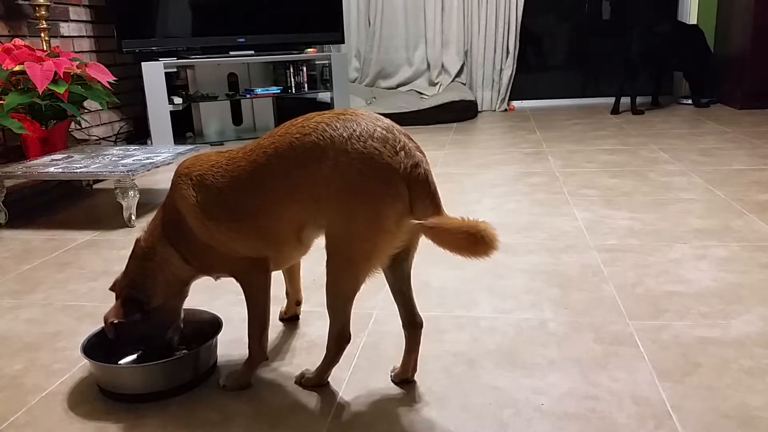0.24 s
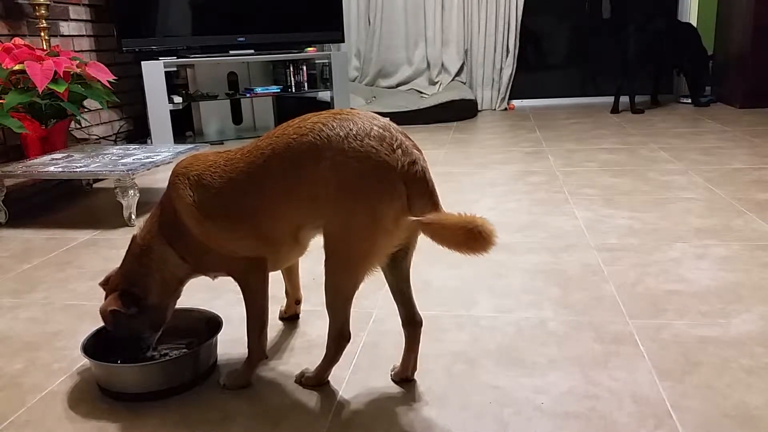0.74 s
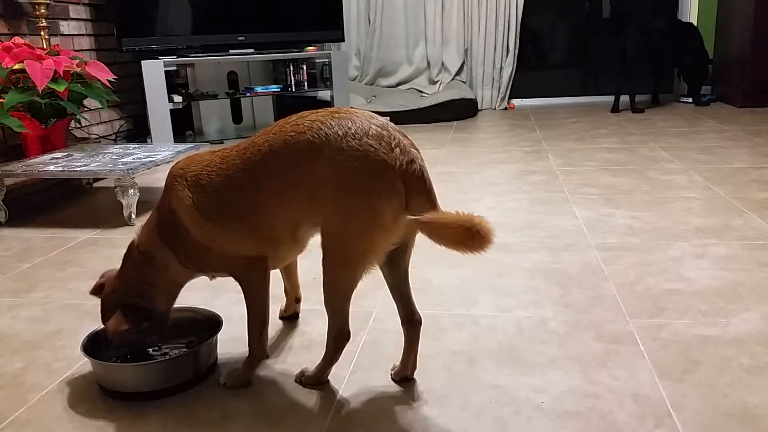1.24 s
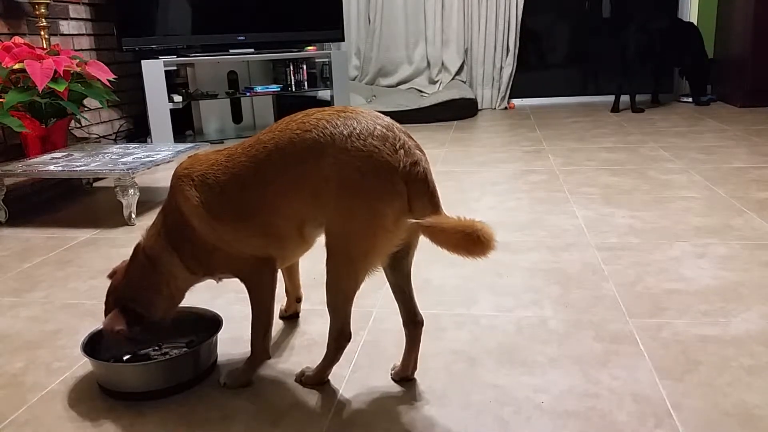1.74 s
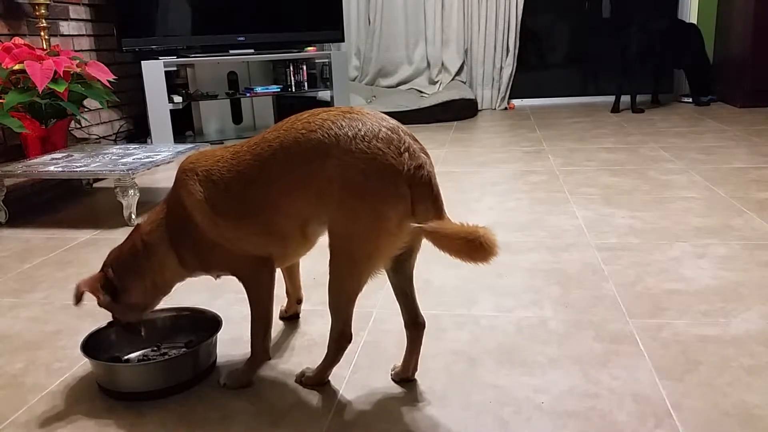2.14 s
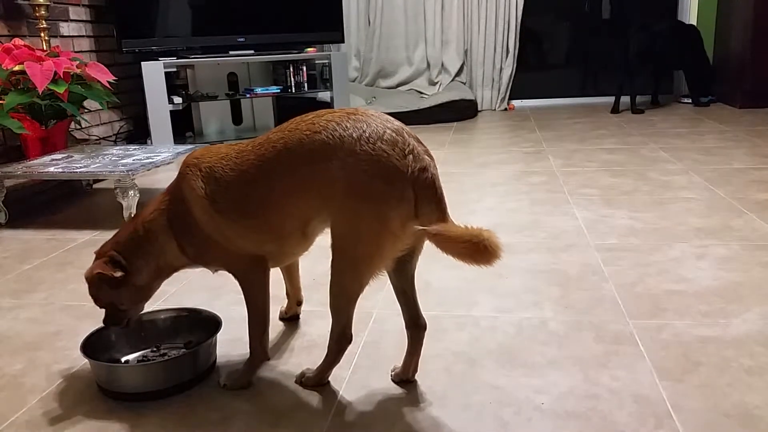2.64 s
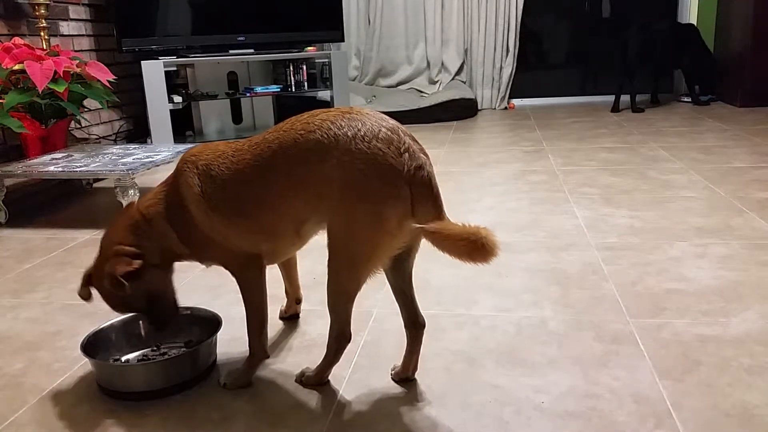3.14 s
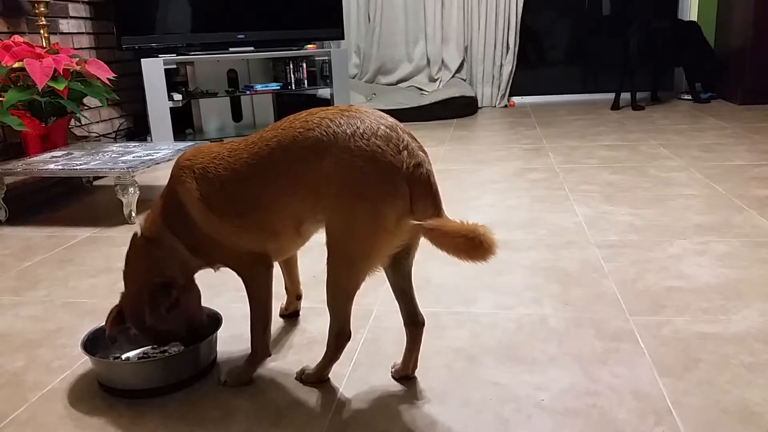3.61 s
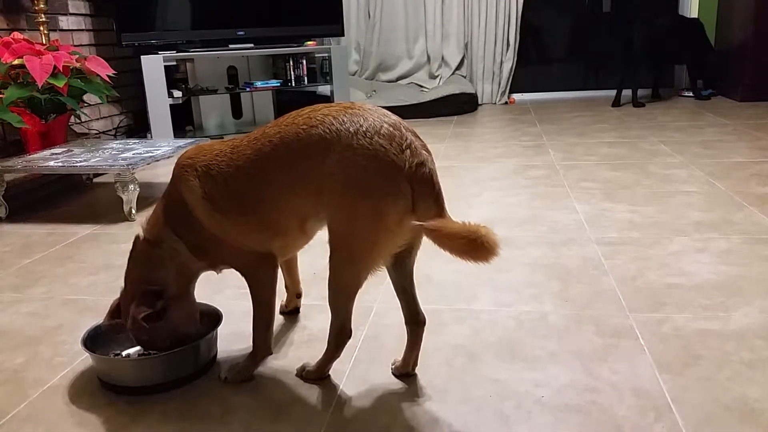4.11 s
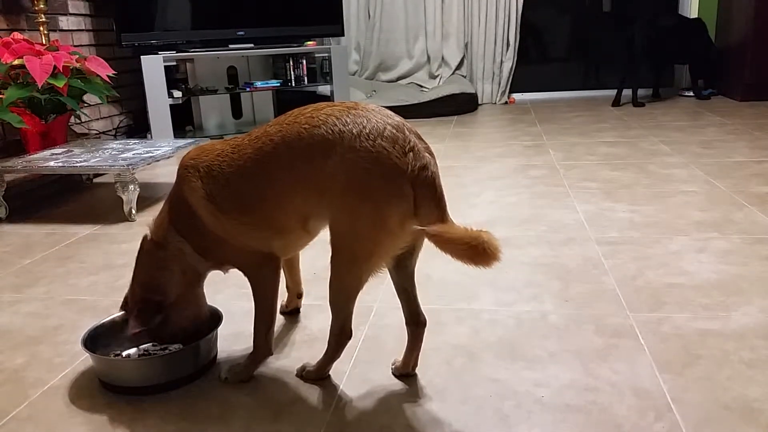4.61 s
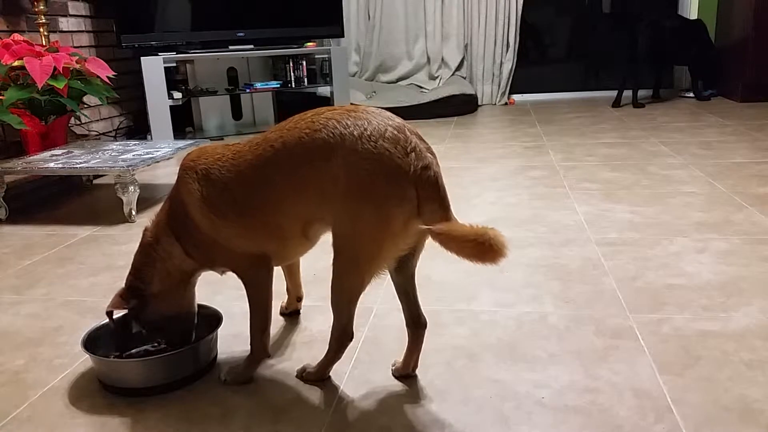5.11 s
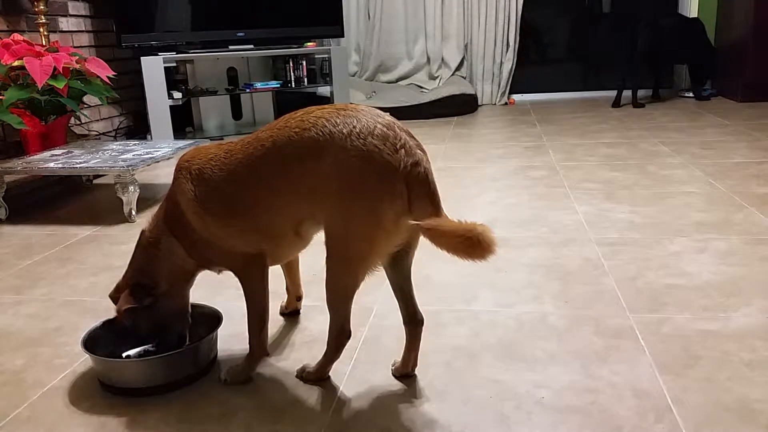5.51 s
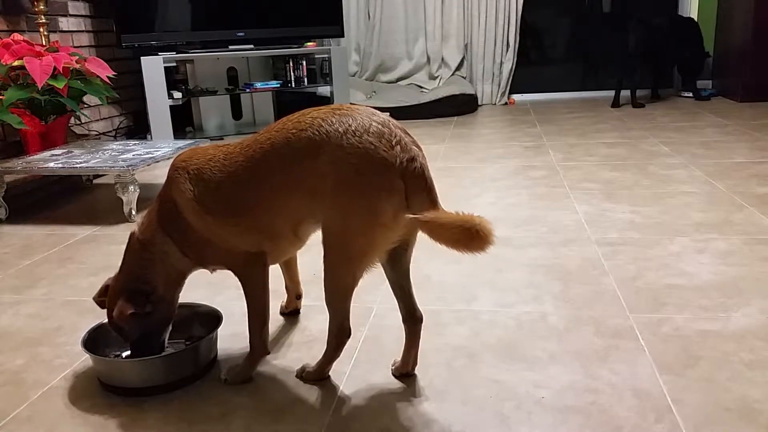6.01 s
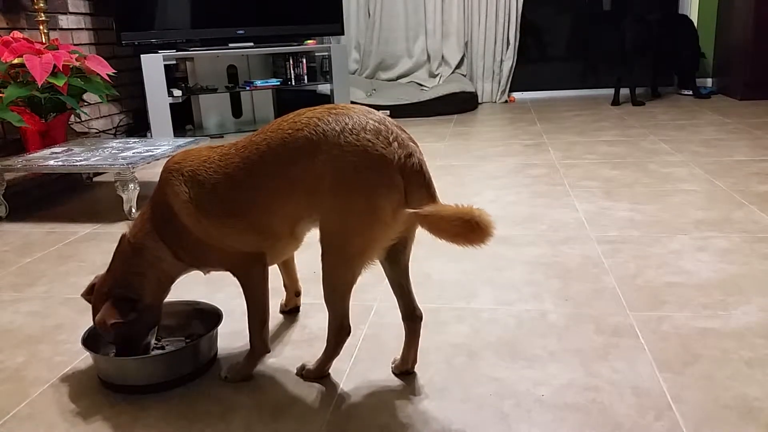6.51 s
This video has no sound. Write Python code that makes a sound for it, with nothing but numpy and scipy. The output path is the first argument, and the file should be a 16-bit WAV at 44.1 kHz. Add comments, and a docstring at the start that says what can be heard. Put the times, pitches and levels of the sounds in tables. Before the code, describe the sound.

A dog crunches dry kibble in short bursts, knocking and rattling its metal bowl in an echoing room.

```python
"""Dog eating from a steel bowl

Dry kibble cracks between a dog's teeth and knocks the bowl, which rings. The muzzle pushes
through loose pellets, and the bowl bumps the tiled floor. The large hard room echoes while
appliances hum far off. The left microphone port is open; the right is shadowed and dull."""
import sys
import numpy as np
from scipy import signal
from scipy.fft import rfft, irfft
from scipy.io import wavfile

SR = 44100
rng = np.random.default_rng(int(sys.argv[2]) if len(sys.argv) > 2 else 0)


def put_to_file(sound):
    """Save the sound as 16-bit audio at rate SR, in the file named by the first command-line argument."""
    columns = np.atleast_2d(sound).T  # one column per channel
    safe = np.clip(columns, -1, 1)
    whole_steps = np.round(safe * 32767)
    wavfile.write(sys.argv[1], SR, whole_steps.astype(np.int16))


N = 297657

# tone colour of the hum: f/Hz, level/dB
HUM_COLOUR = [(12, -47.5), (20, 0), (27, -4), (74, -12), (107, -3), (141, -13), (215, -16.5), (309, -17.5),
              (456, -21), (733, -21), (843, -28.5), (1150, -34.5), (2580, -43), (4380, -45.5),
              (15800, -48.5)]
# how much louder the hum is on the left: f/Hz, level/dB
HUM_LEFT_LEAD = [(60, 1.5), (110, 1.5), (200, 1.0), (380, 2.8), (700, 23), (1290, 4.5), (2380, 2.7),
                 (4400, 1.0), (8120, 0.5), (15000, 0.5)]
# how alike the hum is left and right: f/Hz, likeness (0 or less = unrelated, 1 = the same)
HUM_LIKENESS = [(60, 1), (180, 0.5), (550, -1), (1650, 0.5), (4970, -1.05), (15000, 0.64)]
# appliance drones: f/Hz, width/Hz, level/dB
DRONES = [(112, 22, -84.5), (543, 30, -90)]
# how long the room echoes: f/Hz, t60/s (the time to fade by 60 dB)
ROOM_DECAY = [(60, .4), (500, 0.47), (1000, 0.5), (3000, 0.4), (8000, 0.35), (15000, 0.27)]
# how alike echoes and floor rumble are left and right: f/Hz, likeness
ROOM_LIKENESS = [(60, 0.56), (250, 0.75), (600, .9), (1500, 0.39), (8000, 0.31)]
# path from bowl to open port, with dips from floor and bowl reflections: f/Hz, level/dB
OPEN_PATH = [(100, -9.5), (500, -1), (900, 7.5), (1300, 1), (1620, 4), (2100, -2.5), (2600, -5.5),
             (3000, -4.5), (5000, -7.5), (6500, -10.5), (8400, -13.5), (9000, -32), (12000, -40.5),
             (15000, -55.5)]
# what the shadowed port loses: f/Hz, loss/dB
SHADOW_LOSS = [(110, -9), (380, 6.5), (700, 9), (1290, 9.5), (2380, 16), (4200, 23), (5000, 33), (9000, 25)]
# tone colour of the floor rumble: f/Hz, level/dB
RUMBLE_COLOUR = [(15, -20.5), (40, -8), (100, -2.5), (200, -11.5), (500, -19.5), (2000, -74)]
# the bowl bumps the tiles: t/s, level/dB, f/Hz
FLOOR_BUMPS = [(1.461, -37, 81), (1.599, -41, 68), (2.579, -44, 84), (4.182, -37.5, 90.5),
               (4.24, -43.5, 72), (4.357, -49, 99), (5.048, -62, 107), (6.744, -40.5, 152)]
# the muzzle pushes through the food: t/s, rattle level/dB, rumble level/dB
MUZZLE_PUSHES = [(1.099, -94, -71.5), (1.52, -74, -53.5), (1.66, -59, -51), (2.04, -72.5, -61.5),
                 (2.479, -60.5, -59.5), (2.959, -91, -66), (3.29, -91, -69), (3.478, -55, -60),
                 (3.681, -89.5, -66.5), (4.83, -87, -66), (5.03, -56, -56), (5.44, -99, -71),
                 (6.39, -99, -76), (6.75, -58.5, -63.5)]
# the bowl's modes (notes it rings at) in families of close pitch, deepest first: f/Hz, level/dB, t60/s
BOWL_MODES = [
    [(294, -1, 0.079), (305.4, 0, 0.058)],
    [(397, -4.5, 0.034), (505.7, -0.5, 0.13), (531, 0, 0.19), (576, -1.5, 0.052)],
    [(990, -5.5, 0.037), (1250, -2, 0.039), (1402, -0.5, 0.015), (1425, -3.5, 0.033)],
    [(1900, -14, 0.12), (2024, -6.5, 0.052), (2020, -3, 0.05), (2194, 0, 0.0575), (2193, -4.5, 0.02),
     (2276, -7.5, 0.017)],
    [(2980, -6.5, 0.02), (3038, 2.5, 0.026), (2926, -1, 0.032), (3126, -3, 0.04)],
]
# how readily each family rings, deepest first: level/dB
FAMILY_LEVELS = [-24.5, -5.5, -5, 2, -6]
# soft shoves on the bowl: t/s, level/dB
SHOVES = [(1.321, -56.5), (2.3111, -41.5), (2.3625, -53.5), (2.579, -49.5)]
# small chips ticking: t/s, level/dB, f/Hz
CHIPS = [(1.995, -57, 5950), (2.803, -64, 5320)]
# the brightest shards: t/s, level/dB
SHARDS = [(1.727, -50), (1.795, -46.5), (1.8684, -47.5)]
# pellets breaking: t/s, blow on the bowl/dB, hardness/dB, crack level/dB, crack f/Hz, fizz level/dB
PELLET_BREAKS = [(0.3844, -96.5, -10, -90, 3950, -90), (0.9304, -97.5, -15.5, -100, 5220, -87),
                 (1.1827, -63.5, -1, -105, 3660, -105), (1.2835, -49.5, 7, -51.5, 4230, -50.5),
                 (1.321, -51, -1.5, -51, 4060, -44.5), (1.3554, -49.5, 2, -50, 4400, -44),
                 (1.3824, -26, 6.5, -54.5, 3460, -33.5), (1.4194, -42, 5, -42.5, 3860, -39),
                 (1.4556, -29.5, 5, -42.5, 4220, -34), (1.4894, -41, 3, -43, 4470, -43.5),
                 (1.5294, -42.5, 5.5, -47.5, 4450, -49.5), (1.5854, -41.5, 2, -51, 3940, -57),
                 (1.6184, -58, -6.5, -35, 7900, -37.5), (1.7225, -38, -0.5, -26.5, 4310, -32),
                 (1.7963, -54.5, -7, -31, 4200, -37), (1.867, -49, -4, -42.5, 4530, -40),
                 (2.093, -56.5, 0, -89, 4700, -84), (2.1644, -51, 5, -63, 3940, -100),
                 (2.2334, -54.5, 0.5, -66, 4500, -55.5), (2.3104, -40, -1.5, -55, 4500, -52),
                 (2.3632, -42, -2, -43, 4900, -63), (2.4394, -49.5, 2, -43.5, 4120, -49.5),
                 (2.5474, -57.5, -12.5, -56.5, 4270, -55), (2.6017, -64, -12.5, -74, 3880, -61),
                 (2.6624, -54, 2, -65, 3970, -68), (2.802, -71.5, -2, -80, 5160, -90),
                 (3.2121, -80, -3.5, -101, 3530, -89.5), (3.2757, -58.5, 1, -52, 3970, -88),
                 (3.3648, -49, 3, -49.5, 4300, -56), (3.4401, -38, 0.5, -46.5, 3400, -48.5),
                 (3.4794, -46.5, 5, -49.5, 4100, -66), (3.5194, -54.5, -3.5, -58, 4160, -57),
                 (3.8724, -86, -5, -95, 4910, -90), (4.116, -48.5, -3, -49, 3360, -63),
                 (4.1649, -47.5, -2.5, -46.5, 3880, -44), (4.2294, -57.5, 18, -51.5, 4920, -72),
                 (4.3304, -63.5, -9, -73, 3440, -65), (4.7338, -61, 0.5, -81, 4100, -89),
                 (4.8364, -60.5, -6.5, -101, 4010, -89), (4.8707, -46.5, 3, -69, 3430, -100),
                 (4.9706, -39.5, 1, -50.5, 4360, -53), (5.003, -39, 5, -45, 4460, -41),
                 (5.0594, -46, 3, -48.5, 3920, -50), (5.162, -63, -2, -57, 3120, -61),
                 (5.8687, -87.5, -6, -84.5, 8350, -83.5), (6.4644, -65, -4, -67.5, 4070, -103.5),
                 (6.6045, -62, -2.5, -60.5, 4000, -72), (6.6755, -55.5, -1.5, -59.5, 3530, -51.5)]

SHADOW_LAG_S = 0.00033   # the shadowed port hears later
BOWL_SPOTS = 3   # places to bite, each with its own echo pattern


def from_db(db):
    return 10 ** (np.asarray(db) / 20)


def rms_one(x):
    return x / np.sqrt(np.mean(x ** 2) + 1e-20)


def at_hz(points, hz):
    """Read a table between its rows, along a pitch scale."""
    table_hz, values = np.transpose(points)
    return np.interp(np.log(np.maximum(hz, 1)), np.log(table_hz), values)


def passband(x, low_hz, high_hz, order=3):
    return signal.sosfilt(signal.butter(order, [low_hz, high_hz], "band", fs=SR, output="sos"), x)


def highpass(x, hz, order):
    return signal.sosfilt(signal.butter(order, hz, "high", fs=SR, output="sos"), x)


def click_at(start_s, height):
    click = np.zeros(N)
    click[min(round(start_s * SR), N - 1)] = height
    return click


def ring(clicks, hz, t60):
    """Each click starts a fading sine wave about as tall as itself."""
    decay, turn = from_db(-60 / (t60 * SR)), 2 * np.pi * hz / SR
    return signal.lfilter([0, np.sin(turn)], [1, -2 * decay * np.cos(turn), decay ** 2], clicks + 1e-18)


def noise_pair(size, likeness):
    """Frequencies and spectra of a left and a right white noise whose likeness depends on pitch."""
    hz = np.arange(size // 2 + 1) * SR / size
    mid, side = rfft(rng.standard_normal((2, size)))
    alike = np.clip(at_hz(likeness, hz), 0, 1)
    return hz, (np.sqrt(1 + alike) * mid + np.sqrt(1 - alike) * side * [[1], [-1]]) / np.sqrt(2)


def appliances(hum_db=-71, tone_hz=714):
    """Far appliances make a steady hum, narrow drones and one thin tone, all louder on the left."""
    hz, noise = noise_pair(N, HUM_LIKENESS)
    noise *= from_db(at_hz(HUM_LEFT_LEAD, hz) / 2 * [[1], [-1]])
    noise[1] *= np.exp(-2j * np.pi * hz * SHADOW_LAG_S)   # delays the right side
    hum = from_db(hum_db) * rms_one(irfft(noise * from_db(at_hz(HUM_COLOUR, hz)), N))
    for drone_hz, width_hz, level_db in DRONES:
        peak = 1 / (1 + (2 * (hz - drone_hz) / width_hz) ** 2)
        hum += from_db(level_db) * rms_one(irfft(noise * peak, N))
    tone = np.sin(2 * np.pi * tone_hz * np.arange(N) / SR + [[1.2], [0]])
    return hum + from_db([[-71.5], [-96.5]]) * tone


def room(sound):
    """Echoes die at their own rate in each third of an octave, over a faint tail from farther rooms."""
    size = 2 ** 16
    hz, noise = noise_pair(size, ROOM_LIKENESS)
    noise *= from_db(at_hz(OPEN_PATH, hz) + 6.5)
    noise[1] *= from_db(-at_hz(SHADOW_LOSS, hz))
    t, echo = np.arange(size) / SR, 0
    for centre_hz in 50 * 2 ** np.arange(0, 8.4, 1 / 3):
        octaves_away = np.abs(np.log2(np.maximum(hz, 1) / centre_hz))
        band = irfft(noise * np.clip(1 - 3 * octaves_away, 0, 1), size)
        t60 = at_hz(ROOM_DECAY, centre_hz)
        near, far = from_db(-60 * t / t60), from_db(-26.5 - 25 * t / t60)
        echo += band * (near + far) / np.sqrt(t60 * SR / 14)
    early_boost = 1 + .8 * np.exp(-t / .012)
    fade_in = np.sin(np.minimum(t / .001, 1) * np.pi / 2) ** 2
    out = signal.fftconvolve(sound[None], echo * early_boost * fade_in, axes=1)[:, :N]
    out[1] = np.interp(np.arange(N) - SHADOW_LAG_S * SR, np.arange(N), out[1])
    return out


def floor_bumps(rumble_db):
    """The bowl's soft, booming knocks and a low rumble travel through the tiles to both ports."""
    booms = np.zeros(N)
    for start_s, level_db, boom_hz in FLOOR_BUMPS:
        click = click_at(start_s, -from_db(level_db + 1.5))
        booms += ring(click, boom_hz, 3.3 / boom_hz)
        booms += from_db(-9.5) * ring(click, 1.5 * boom_hz, 1.8 / boom_hz)   # a quick push on top
    hz, noise = noise_pair(N, ROOM_LIKENESS)
    rumble = rms_one(irfft(noise * from_db(at_hz(RUMBLE_COLOUR, hz)), N))
    floor = passband(booms, 35, 500, order=2) + from_db(rumble_db - 4.5) * rumble
    return floor * from_db([[1.5], [-1.5]])


def muzzle_thuds():
    """The muzzle shoves the wall of the bowl, ringing only its deepest modes."""
    clicks = sum(click_at(start_s, from_db(level_db)) for start_s, level_db in SHOVES)
    steel = sum(from_db(db) * ring(clicks, hz, t60) for hz, db, t60 in BOWL_MODES[0])
    return passband(steel, 360, 4000)


def pellet_rattle(level_db, ticks_per_s=1300):
    """Loose pellets tick against each other and against the steel."""
    hits = rng.random(N) < ticks_per_s / SR
    ticks = hits * from_db(1.4 * np.minimum(rng.exponential(1, N), 5)) * rng.choice([-1, 1], N)
    steel = sum(from_db(db) * ring(ticks, hz, 0.23 * t60) for hz, db, t60 in sum(BOWL_MODES[2:], []))
    pellets = passband(ticks, 1300, 7100)
    return from_db(level_db - 2.5) * (rms_one(pellets) + from_db(3) * rms_one(steel))


def chip_ticks():
    """Small chips make short, high, dry ticks close by, mostly on the left."""
    ticks = sum(ring(click_at(start_s, 2 * from_db(db)), hz, t60=.03) for start_s, db, hz in CHIPS)
    return ticks * from_db([[0], [-25]])


def crumble(noise, fade_s):
    """A pellet breaks with one snap and a dying spray of uneven clicks, made from two rows of noise."""
    t = np.arange(noise.shape[1]) / SR
    spray = noise[0] * noise[1] ** 2 * np.exp(-t / np.clip(fade_s, .002, .06))
    spray[0] = 20   # the snap
    return spray / np.sqrt(np.sum(spray ** 2))


def splinters(size=4096):
    """Three breaks in quick succession throw a very bright spray."""
    sprays = np.zeros(N)
    for start_s, level_db in SHARDS:
        start = round(start_s * SR)
        spray = crumble(rng.standard_normal((2, size)), fade_s=.02)
        sprays[start:start + size] += from_db(level_db + 50) * spray
    return highpass(sprays, 9000, order=6)


def bites(breaks, size=8192):
    """Each breaking pellet knocks dryly, cracks at its own pitch, fizzes on top and rings the bowl."""
    modes = sum(BOWL_MODES, [])
    mode_db = np.array(modes)[:, 1]
    family_of_mode = np.repeat(np.arange(len(BOWL_MODES)), [len(family) for family in BOWL_MODES])
    polarity = (-1) ** np.arange(len(modes))   # neighbouring modes swing opposite ways
    tilt = np.array([-2, -2, -1, 0, 1])   # hardness favours the higher families
    free_blows, damped_blows = np.zeros((2, len(modes), N + size))
    knocks, cracks, fizz = np.zeros((3, N + size))
    for start_s, blow_db, hardness_db, crack_db, crack_hz, fizz_db in breaks:
        start = round(start_s * SR)
        span = slice(start, start + size)
        noise = rng.standard_normal((3, size))
        spray = crumble(noise, fade_s=.019 * from_db(.3 * (crack_db - fizz_db)))   # dull breaks last longer
        family_db = blow_db + np.array(FAMILY_LEVELS) + hardness_db * tilt
        strength_db = family_db[family_of_mode] + mode_db + 2.93 * noise[2, :len(modes)]
        blow = np.outer(polarity * from_db(strength_db + 2.5), spray)
        # hard blows lift the wall off the muzzle and food that damp it
        freedom = np.clip((max(family_db) + 43.5) / 14, 0, 1)
        free_blows[:, span] += freedom * blow
        damped_blows[:, span] += 1.6 * (1 - freedom) * blow
        # the knock grows more slowly than the ring, so hard blows ring clearer
        knocks[span] += from_db(0.74 * max(family_db[2:]) + 12.5) * spray
        cracks[span] += from_db(crack_db + 20) * ring(spray, crack_hz, 14 / crack_hz)
        fizz[span] += from_db(fizz_db + 30) * spray
    steel = sum(ring(free, hz, t60) + ring(damped, hz, .3 * t60)
                for free, damped, (hz, _, t60) in zip(free_blows, damped_blows, modes))
    bowl = passband(steel, 240, 3200) + passband(knocks, 733, 4200)
    crunch = passband(cracks, 1800, 9500) + passband(fizz, 5200, 11000)
    return (bowl + crunch)[:N]


def scene():
    """Eating sounds come through the room, bumps through the floor, and the hum never stops."""
    t = np.arange(N) / SR
    push_s, *levels = np.transpose(MUZZLE_PUSHES)
    rattle_db, rumble_db = [np.interp(t, push_s, level_db, left=-120) for level_db in levels]
    eating = sum(room(bites(PELLET_BREAKS[spot::BOWL_SPOTS])) for spot in range(BOWL_SPOTS))
    eating += room(pellet_rattle(rattle_db) + splinters() + muzzle_thuds())
    return eating + chip_ticks() + floor_bumps(rumble_db) + appliances()


def record(dry, smoothing_s=0.05155, cutoff_hz=15907.5):
    """A faint hiss on both sides swells and sinks with the left side's loudness; the very top is cut."""
    memory = np.exp(-1 / (smoothing_s * SR))
    loudness = np.sqrt(signal.lfilter([1 - memory], [1, -memory], dry[0] ** 2) + 1e-20)
    white = rng.standard_normal((2, N))
    hiss = highpass(white, 12000, order=3) + from_db(-20) * white
    with_hiss = dry + from_db(-49.5) * loudness ** 0.65 * hiss
    return signal.sosfilt(signal.cheby2(14, 40, cutoff_hz, fs=SR, output="sos"), with_hiss)


dry = scene()
out = record(dry)
put_to_file(out)
```